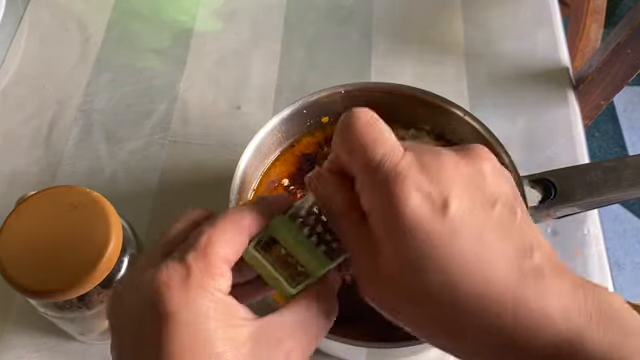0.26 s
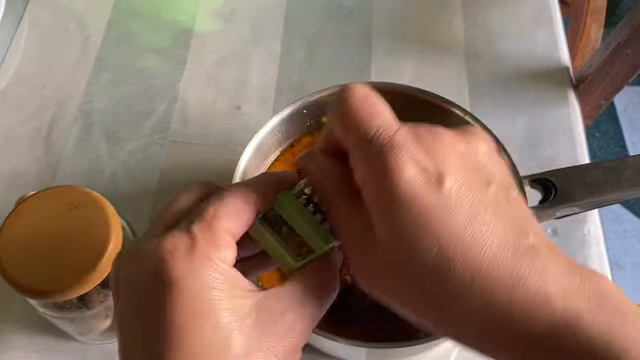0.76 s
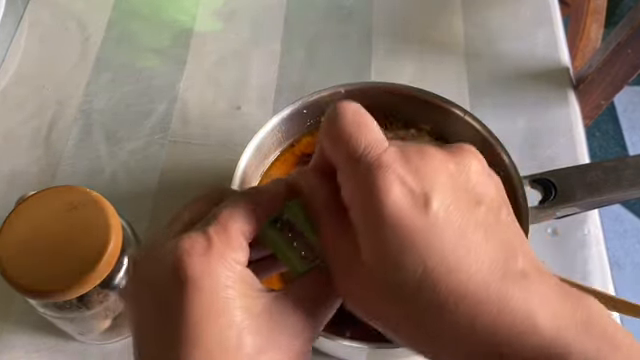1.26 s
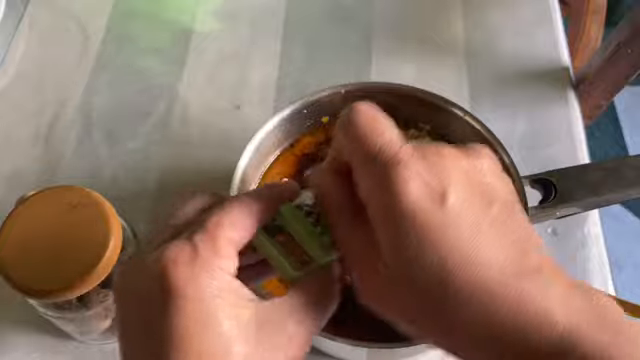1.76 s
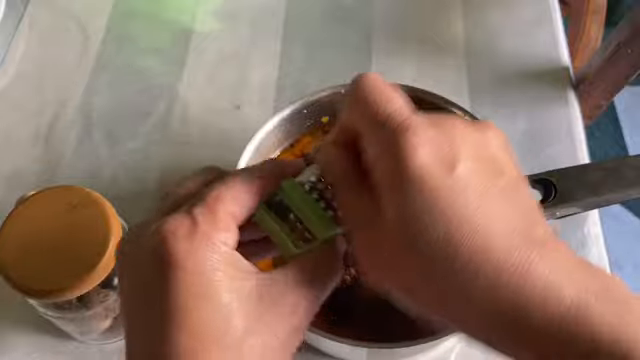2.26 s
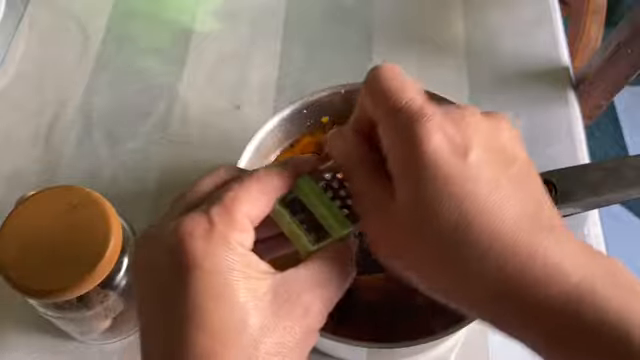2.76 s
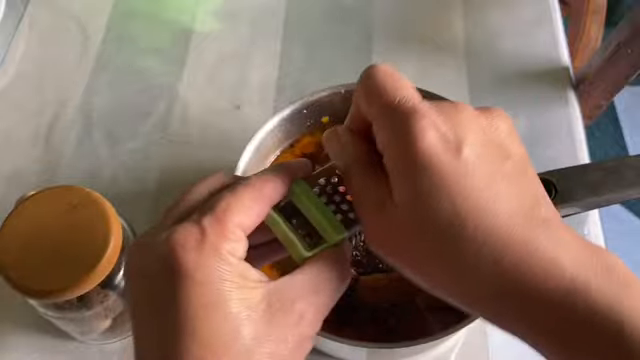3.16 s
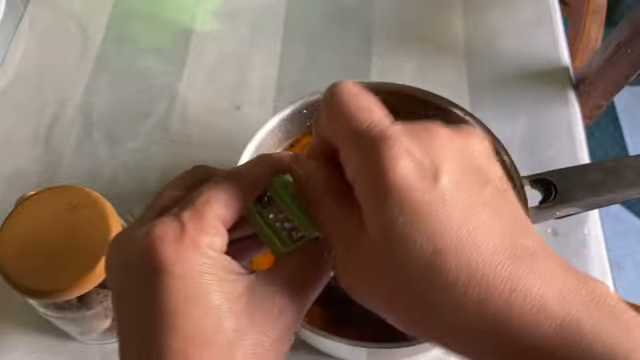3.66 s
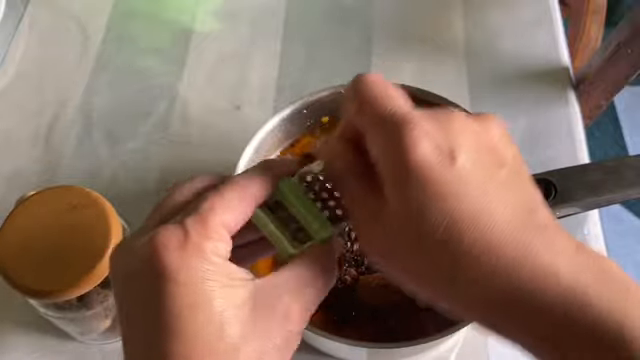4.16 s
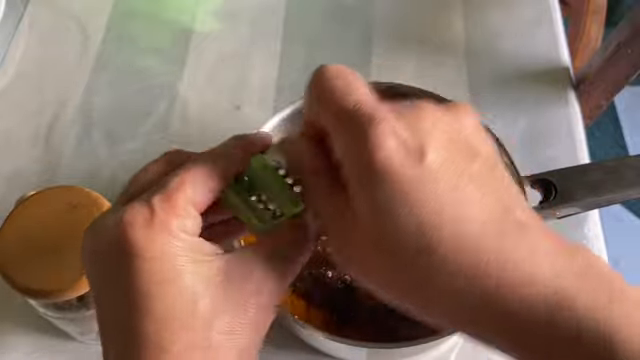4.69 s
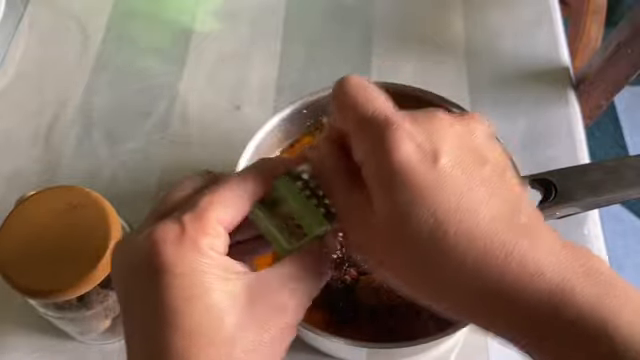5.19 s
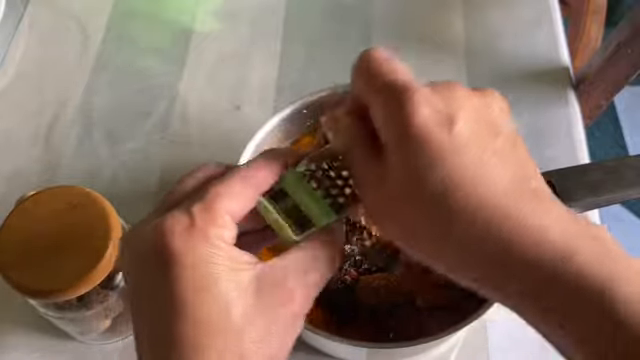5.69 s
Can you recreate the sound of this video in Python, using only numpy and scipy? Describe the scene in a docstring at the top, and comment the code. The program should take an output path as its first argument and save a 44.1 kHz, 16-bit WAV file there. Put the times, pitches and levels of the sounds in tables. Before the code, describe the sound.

A whole nutmeg is rubbed quickly to and fro on a small hand-held steel grater, close to the microphone in a kitchen. From the start, dry, gritty rasps come about five times a second, each a short push followed by a mostly lighter return, with a thin ring from the steel. The rhythm breaks briefly at about 1.2 seconds and resumes at 1.4. From around 2.2 seconds the pushes are firmer and brighter, continuing evenly to the end at about 6 seconds. The teeth now and then snag with a sharp crunch, hardest near 2.4, 2.5 and 4.2 seconds. Very short echoes come off a pan, with a light, longer echo from the room. Underneath lie a quiet low rumble and a steady hiss, while a wavering low hum swells and fades, strongest between about 2.5 and 4 seconds.

```python
"""A whole nutmeg rubbed quickly to and fro on a small hand-held steel grater, close up in a kitchen.
The teeth bite off dry crumbs in short bursts, now and then snag hard, and set the plate ringing.
Short echoes come off a pan, longer ones off the room. Underneath lie a low rumble, a steady hiss
and a wavering hum. The microphone has two closely spaced ports, left and right."""
import sys
import numpy as np
from scipy import signal
from scipy.fft import rfft, irfft, next_fast_len
from scipy.io import wavfile

SR = 44100
rng = np.random.default_rng(int(sys.argv[2]) if len(sys.argv) > 2 else 0)


def bounce(signal):
    """Save signal as a 16-bit WAV file at the path given by the first command-line argument."""
    frames = np.transpose(np.atleast_2d(signal))
    limited = np.clip(frames, -1, 1)
    pcm = np.round(limited * 32767).astype(np.int16)
    wavfile.write(sys.argv[1], SR, pcm)


N = 261712
TIME = np.arange(N) / SR
SIZE = next_fast_len(N + SR)
HZ = np.maximum(np.arange(SIZE // 2 + 1) * SR / SIZE, 1)


def from_db(db):
    """Decibels to gain."""
    return 10 ** (np.asarray(db) / 20)


def rms_one(x):
    """Scale to rms 1."""
    return x / np.sqrt(np.mean(x ** 2) + 1e-20)


def over_hz(points):
    """A table read at every frequency, on a log axis."""
    hz, value = np.transpose(points)
    return np.interp(np.log(HZ), np.log(hz), value)


def filtered(x, response):
    """Apply a frequency response."""
    return irfft(rfft(x, SIZE) * response, SIZE)[..., :N]


def coloured(x, spectrum, low=0, high=SR):
    """Give x a spectrum between two edges; rms 1."""
    return rms_one(filtered(x, from_db(over_hz(spectrum)) * (HZ >= low) * (HZ < high)))


def drift(per_s):
    """A random wander of rms 1, taking per_s new values a second."""
    knots = rng.standard_normal(int(per_s * N / SR) + 2)
    return rms_one(np.interp(TIME * per_s, np.arange(len(knots)), knots))


# Low end of the kitchen's background: frequency_hz, density_db
RUMBLE_SPECTRUM = [(20, -30), (33, -28), (47, -0.5), (64, -2), (90, -7.5), (130, -2), (165, -4),
                   (190, -8.5), (240, -7.5), (320, -10.5), (500, -17), (900, -33), (2000, -26)]

def rumble(level_db):
    """Deep, steady noise under the whole scene."""
    return from_db(level_db) * coloured(rng.standard_normal((2, N)), RUMBLE_SPECTRUM)


# Hiss at the microphone: frequency_hz, density_db
HISS_SPECTRUM = [(300, 3.5), (1000, -5), (2500, 3.5), (4500, -1.5), (8000, 4), (11000, 1), (13000, 6.5),
                 (15500, 3)]

def hiss(level_db):
    """Broad, steady noise reaching high into the treble."""
    return from_db(level_db) * coloured(rng.standard_normal((2, N)), HISS_SPECTRUM)


# The hand's rubs to and fro, about five a second; a force of 0 dB is an ordinary stroke:
# start_s, push_length_s, push_force_db, return_after_s, return_force_db
RUBS = [(.034, .058, -2.5, 0.11, -2.5), (.231, .043, 2, 0.051, -12.5), (.432, 0.047, -3, 0.085, 1),
        (0.614, 0.041, 0, 0.097, -1), (.814, 0.048, -1, 0.083, -2), (.988, 0.069, 0.5, 0.12, -12),
        (1.416, 0.051, -1.5, 0.079, -3.5), (1.587, 0.057, 2.5, 0.1, 1), (1.794, 0.039, 1, 0.11, -15),
        (2.004, 0.052, -4.5, 0.095, -7.5), (2.191, 0.053, 3, .11, -3), (2.399, 0.04, 9, 0.084, -7),
        (2.594, 0.032, 4, 0.088, -4), (2.78, 0.048, 3.5, 0.11, -23), (2.978, .054, 6, 0.1, -5.5),
        (3.173, 0.052, -4, 0.1, -6), (3.377, .041, 4.5, 0.096, -5), (3.577, 0.045, 7.5, 0.093, -4.5),
        (3.766, 0.061, 2.5, .12, -0.5), (3.981, .057, 6.5, .107, -3), (4.197, 0.051, 4.5, 0.12, -2),
        (4.403, 0.048, 3, 0.1, -1.5), (4.603, 0.057, 5, 0.11, -5.5), (4.807, 0.052, 2.5, .103, -6.5),
        (5.011, 0.053, 4.5, 0.1, -5.5), (5.208, 0.056, 3.5, .113, -4.5), (5.424, 0.072, 2.5, 0.095, -6),
        (5.634, .051, 5, 0.095, -8), (5.826, 0.07, 2, 0.094, -9.5)]

def strokes(return_length_s=0.047):
    """Every rub is a push and a mostly lighter return: rows of start_s, length_s, force_db."""
    pushes = [(start, length, db) for start, length, db, _, _ in RUBS]
    returns = [(start + turn, return_length_s, db) for start, _, _, turn, db in RUBS]
    return np.array(pushes + returns)


def pressure(force_share, slide_db, grip_s=0.0078, release_s=0.0048, arch_db=3.0, slide_s=0.043):
    """The nut slides in lightly, grips, bites hardest midway and lets go at the turn."""
    power = np.zeros(N)
    for start, length, force_db in strokes():
        near = (TIME > start - .15) & (TIME < start + length + .15)
        t = TIME[near] - start
        arch = np.sin(np.pi * np.clip(t / length, 0, 1)) - 1
        grip = .5 + .5 * np.tanh(t / grip_s)
        release = np.exp(-np.maximum(t - length, 0) / release_s)
        bite = from_db(force_share * force_db + arch_db * arch) * grip * release
        slide = from_db(slide_db) * np.exp(-((t - length / 2) / slide_s) ** 2)
        power[near] += bite ** 2 + slide ** 2
    return np.sqrt(power)


def teeth(per_s, jitter):
    """Samples at which the nut meets the next row of teeth."""
    gaps = np.exp(jitter * rng.standard_normal(N // 100))
    at = np.cumsum(gaps) * SR / per_s
    return at[at < N].astype(int)


def fractures(per_s, spread_db):
    """Dense tiny cracks of uneven size, radiated along two paths."""
    cracking = rng.random(N) < per_s / SR
    sizes = from_db(spread_db * rng.standard_normal(N).clip(-2, 2))
    return cracking * sizes * rng.standard_normal((2, N))


def bursts(clicks, rise_s):
    """Each click swells to its own height in rise_s, then dies away."""
    r = np.exp(-1 / (rise_s * SR))
    return signal.lfilter([0, np.e * r / (rise_s * SR)], [1, -2 * r, r * r], clicks + 1e-18)


# Dry nut crumbling on steel, heard close: frequency_hz, density_db
CRUMBLE_SPECTRUM = [(300, -6.5), (700, -8), (880, -8.5), (1050, -2), (1400, -0.5), (1800, -2), (2400, 3.5),
                    (3000, -5.5), (4500, -4.5), (5600, -2), (6900, 0.5), (9500, -3), (12000, -3),
                    (16000, -9)]
# Its three registers, body, rasp and fizz: low_hz, high_hz
REGISTERS = [(250, 1800), (1800, 5000), (5000, 17000)]

def grating(levels_db, force_shares, slides_db, rub=0.72, bite_spread_db=3.5, colour_spread_db=2.0):
    """Cracks burst at each row of teeth over a steadier rub; force raises rasp and fizz the most."""
    at = teeth(per_s=105, jitter=.35)
    depth_db = bite_spread_db * rng.standard_normal(len(at)).clip(-1.5, 1.5)
    cracks = fractures(per_s=14000, spread_db=1.5)
    out = 0
    for (low, high), level_db, share, slide_db in zip(REGISTERS, levels_db, force_shares, slides_db):
        bites = np.zeros(N)
        bites[at] = from_db(depth_db + colour_spread_db * rng.standard_normal(len(at)))
        cutting = rms_one(rub + bursts(bites, rise_s=0.0011))
        force = from_db(level_db) * pressure(share, slide_db)
        out += force * cutting * coloured(cracks, CRUMBLE_SPECTRUM, low, high)
    return out


# Modes of the steel plate, damped by the hand: pitch_hz, width_hz, level_db
PLATE_MODES = [(1020, 160, -8.5), (1450, 110, -9.5), (1507, 28, -8), (1834, 35, -0.5), (2138, 9, 8),
               (2208, 51, 1.5), (2378, 32, -7.5), (2565, 35, -0.5), (3536, 61, -1.5), (3710, 180, -5),
               (4370, 68, -19), (6320, 86, -16), (6970, 180, -15), (7800, 240, -5.5)]

def plate(nut, shift_db):
    """The steel rings in its modes; each is fed more or less as the nut crosses its nodes."""
    out = 0
    for k, (hz, width_hz, level_db) in enumerate(PLATE_MODES):
        swing_db = shift_db * np.sqrt(hz / 2500)   # higher modes have more nodes
        fed = nut * from_db(level_db + swing_db * drift(35).clip(-1.5, 1.5))
        r = np.exp(-np.pi * width_hz / SR)
        gain = (1 - r * r) / 2
        feedback = [1, -2 * r * np.cos(2 * np.pi * hz / SR), r * r]
        out += (-1) ** k * signal.lfilter([gain, 0, -gain], feedback, fed)
    return out[::-1]   # the plate radiates along other paths than the nut


def reflections(x, t60_s, delay_s, wall_hz, patterns=3):
    """A dying cloud of echoes, duller above wall_hz; the moving hands keep changing its pattern."""
    weights = np.array([drift(18) for _ in range(patterns)])
    decay = from_db(-60 * np.minimum(TIME / t60_s, 5)) * (TIME > delay_s)
    spectrum = 0
    for weight in weights / np.linalg.norm(weights, axis=0):
        echoes = rng.standard_normal((2, N)) * decay / np.linalg.norm(decay)
        spectrum += rfft(x * weight, SIZE) * rfft(echoes, SIZE)
    return irfft(spectrum / (1 + 1j * HZ / wall_hz), SIZE)[:, :N]


def catches(first_db, later_db, force_share, spread_db, per_stroke):
    """Teeth catch lightly as each push sets in and along every stroke: rows of start_s, level_db."""
    first = [(start, first_db + force_share * db) for start, _, db, _, _ in RUBS]
    start, length, force_db = strokes().T[:, :, None]
    slots = np.arange(per_stroke) + rng.uniform(.2, .8, (len(start), per_stroke))
    when = start + length * slots / per_stroke
    scatter_db = spread_db * rng.standard_normal(when.shape).clip(-1.5, 1.5)
    level_db = later_db + force_share * force_db + scatter_db
    later = np.column_stack([when.ravel(), level_db.ravel()])
    rows = np.vstack([first, later])
    return rows[rows[:, 0] < TIME[-1]]


def stalling(snags_s, depth, hold_s):
    """Just before a snag breaks, the tooth holds the nut and the rubbing dips."""
    held = np.zeros(N)
    held[((snags_s - hold_s / 2) * SR).astype(int)] = 1
    window = np.hanning(2 * int(hold_s * SR) + 1)
    return 1 - np.clip(depth * signal.fftconvolve(held, window, "same"), 0, .9)


# A tooth snags hard and breaks free, close to the microphone: start_s, level_db
HARD_SNAGS = [(.148, -11), (.918, -16.5), (0.996, -13.5), (1.109, -14), (1.13, -15.5), (1.142, -14.5),
              (1.441, -12), (1.691, -16), (1.795, -13), (2.012, -16.5), (2.031, -17), (2.051, -11),
              (2.106, -14), (2.133, -17), (2.323, -12), (2.39, -15), (2.403, -6), (2.414, -17),
              (2.504, -7.5), (2.597, -14), (2.782, -15), (3.006, -11), (3.191, -13.5), (3.378, -15.5),
              (3.606, -11.5), (3.89, -13), (3.983, -12.5), (4.204, -7), (4.222, -12), (4.309, -13.5),
              (4.404, -15), (4.603, -16.5), (5.239, -14.5), (5.657, -16)]

def snagging(rubbing, light_snags, gain_db, colour_spread_db):
    """Each snag, light or hard, stalls the rubbing, then tears out a larger crumb in one sharp burst."""
    when, snag_db = np.vstack([light_snags, HARD_SNAGS]).T
    cracks = coloured(fractures(per_s=36000, spread_db=0.0), CRUMBLE_SPECTRUM)
    colours_db = colour_spread_db * rng.standard_normal((len(when), len(REGISTERS)))
    out = rubbing * stalling(when, depth=0.3, hold_s=0.0062)
    for (low, high), colour_db in zip(REGISTERS, colours_db.T):
        clicks = np.zeros(N)
        clicks[(when * SR).astype(int)] = from_db(snag_db + gain_db + colour_db)
        out += bursts(clicks, rise_s=0.0013) * filtered(cracks, (HZ >= low) * (HZ < high))
    return out


# Swells of a low hum behind the grater: start_s, end_s, pitch_hz, fundamental_db, octave_db
HUM_SWELLS = [(.4, 2.3, 59.5, -52, -41), (2.45, 2.9, 58.7, -40, -35), (3.05, 3.52, 58.2, -36, -35),
              (3.7, 4.04, 58.7, -34, -33.5), (4.801, 6.3, 65.6, -64, -40.5)]

def hum(waver_db, waver_hz, fade_s):
    """A low hum and its octave swell, waver and fade, the same in both channels."""
    bend_hz = waver_hz * drift(4.97)
    waver = from_db(waver_db * np.array([drift(6.94), drift(7)]))
    out = 0
    for start, end, hz, fundamental_db, octave_db in HUM_SWELLS:
        swell = (np.tanh((TIME - start) / fade_s) - np.tanh((TIME - end) / fade_s)) / 2
        phase = 2 * np.pi * np.cumsum(hz + bend_hz) / SR
        fundamental = from_db(fundamental_db) * waver[0] * np.sin(phase)
        octave = from_db(octave_db) * waver[1] * np.sin(2 * phase)
        out += swell * (fundamental + octave)
    return out


# How alike left and right sound; the top treble is nearly the same in both: frequency_hz, likeness
STEREO_LIKENESS = [(100, .88), (250, .62), (600, .33), (1100, .78), (1600, .58), (2200, .5), (3600, .6),
                   (5500, .3), (6300, .45), (6800, .9), (8000, .82), (8800, .985)]
# How much louder the left is: frequency_hz, balance_db
STEREO_BALANCE = [(200, -.3), (700, 2.2), (1050, 2.3), (1500, -1.2), (2000, 2), (2300, 7), (3000, 4.2),
                  (4500, 4.8), (6300, 6), (6900, 1.5), (8500, 0)]
# How far the left leads in phase: frequency_hz, lead_rad
STEREO_LEAD = [(400, 0), (1200, .6), (1900, 1.5), (2250, 2.6), (2900, 1.3), (4300, 0), (5400, -2),
               (6000, -5.4), (6800, -6.25), (16000, -19.9)]

def stereo(paths):
    """Two paths blend into left and right; in the treble the left hears the grater a little later."""
    alike = np.clip(over_hz(STEREO_LIKENESS), 0, .999)
    balance_db = over_hz(STEREO_BALANCE)
    lead_rad = np.interp(HZ, *np.transpose(STEREO_LEAD))
    common, apart = rfft(paths, SIZE) * np.sqrt([(1 + alike) / 2, (1 - alike) / 2])
    left = (common + apart) * from_db(balance_db / 2) * np.exp(1j * lead_rad)
    right = (common - apart) * from_db(-balance_db / 2)
    return irfft([left, right], SIZE)[:, :N]


def scene():
    """The grater up close, its echoes off pan and kitchen, and the background, in stereo."""
    light_snags = catches(first_db=-24.5, later_db=-21, force_share=0.68, spread_db=2.0, per_stroke=2)
    rubbing = grating(levels_db=[-31, -26.8, -23.5], force_shares=[.35, .95, 1.05],
                      slides_db=[-10, -9, -13])   # each list: body, rasp, fizz
    nut = snagging(rubbing, light_snags, gain_db=1.0, colour_spread_db=1.1)
    grater = nut + plate(nut, shift_db=5.5)
    pan = from_db(-8.0) * reflections(grater, t60_s=0.11, delay_s=0.001, wall_hz=6950)
    kitchen = from_db(-7.5) * reflections(grater, t60_s=0.71, delay_s=0.012, wall_hz=5300)
    background = rumble(level_db=-34.0) + hiss(level_db=-28.0)
    return stereo(grater + pan + kitchen + background) + hum(waver_db=3.0, waver_hz=0.37, fade_s=0.041)


def record(dry, ceiling=1.5, cutoff_hz=15950):
    """The tallest peaks are rounded and the top of the treble is cut steeply."""
    rounded = ceiling * np.tanh(dry / ceiling)
    return filtered(rounded, 1 / np.sqrt(1 + (HZ / cutoff_hz) ** 300))


dry = scene()
out = record(dry)
bounce(out)
```